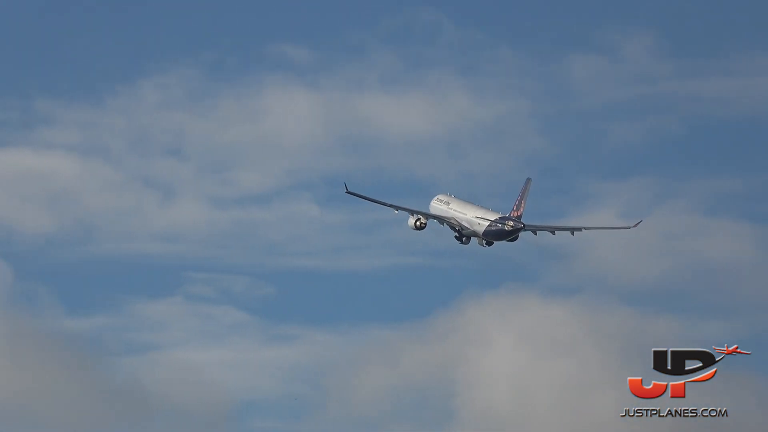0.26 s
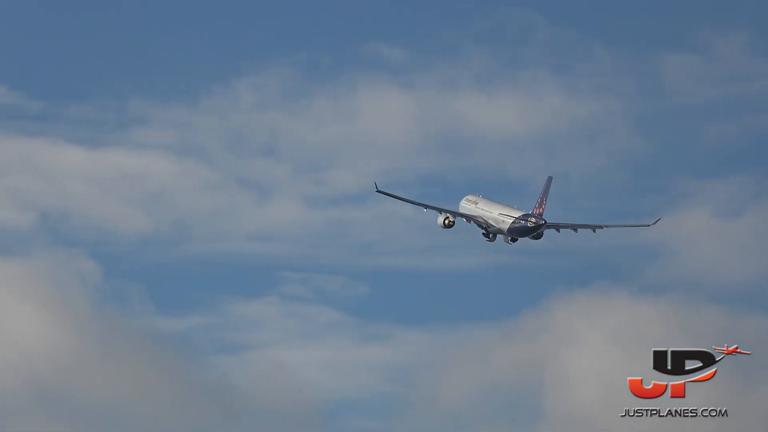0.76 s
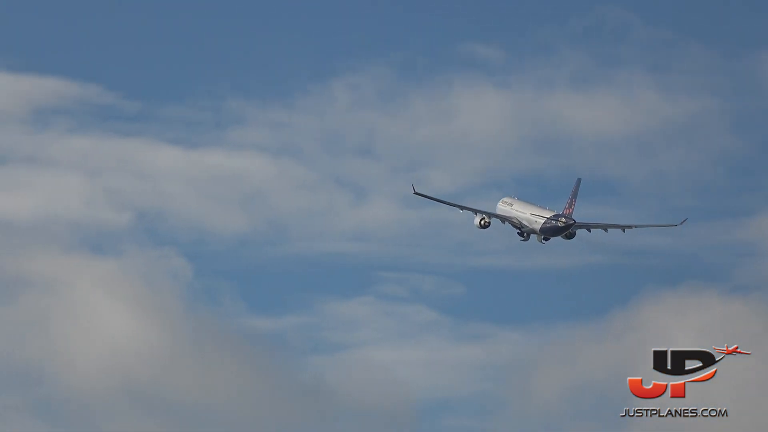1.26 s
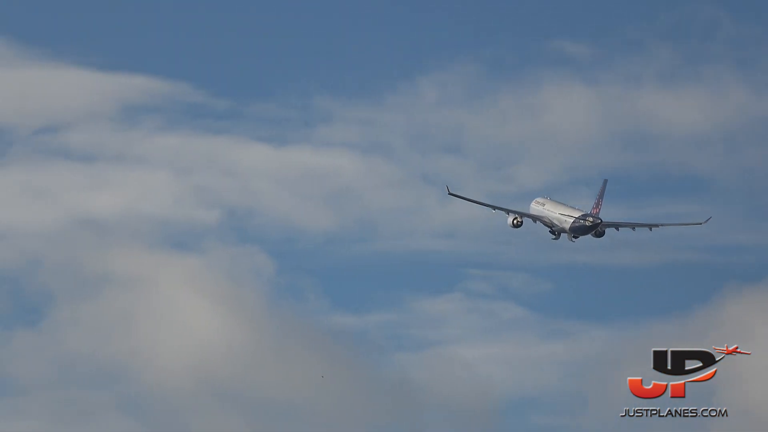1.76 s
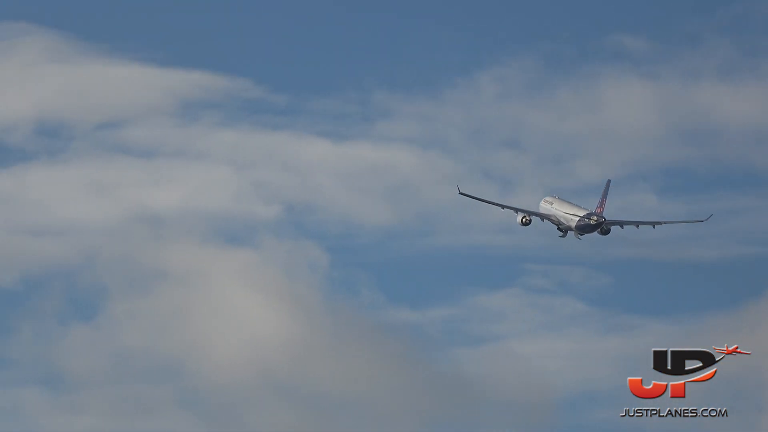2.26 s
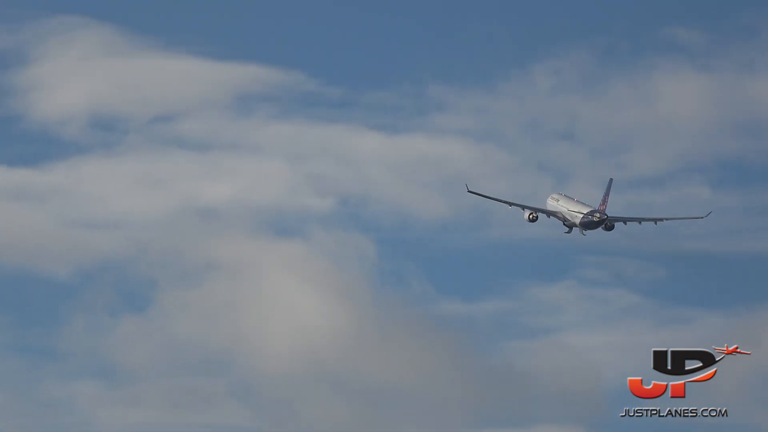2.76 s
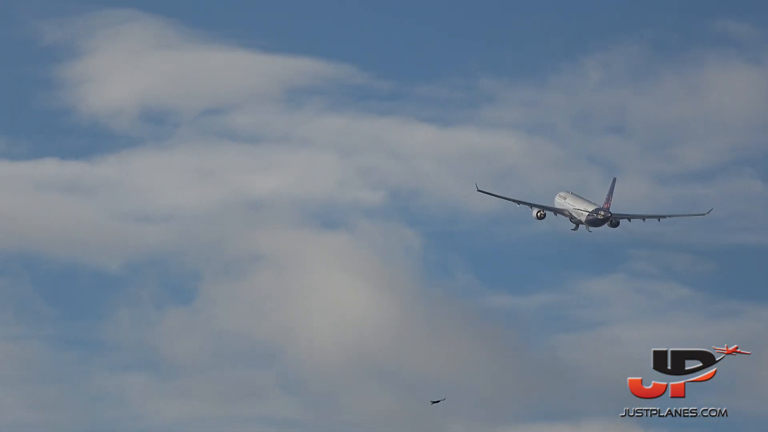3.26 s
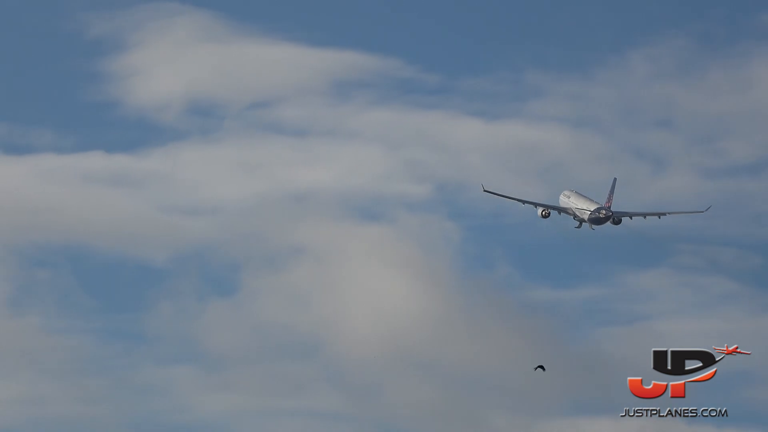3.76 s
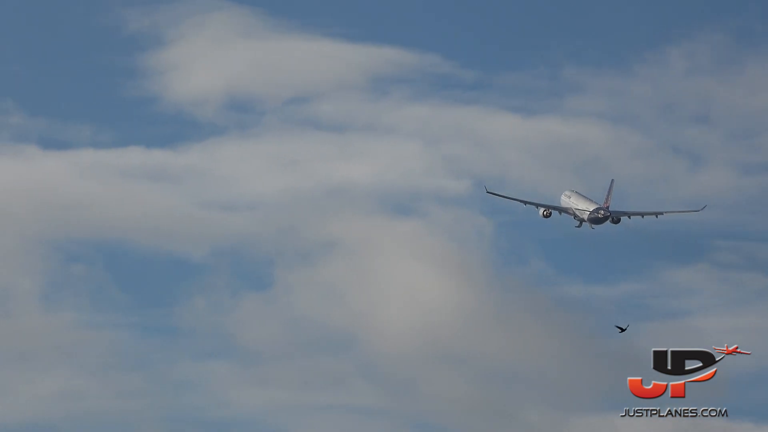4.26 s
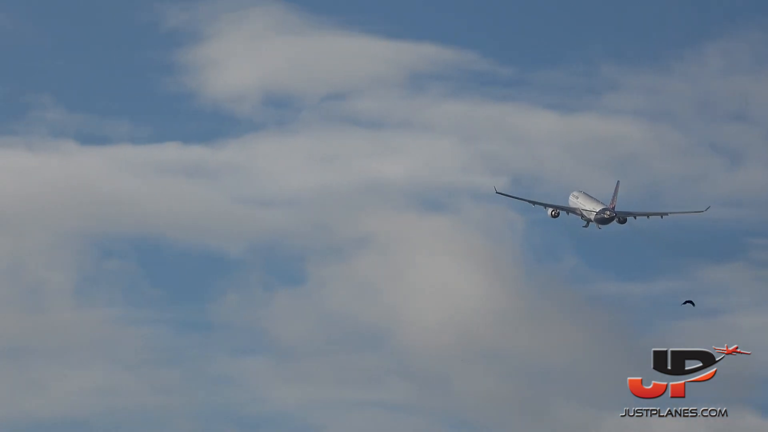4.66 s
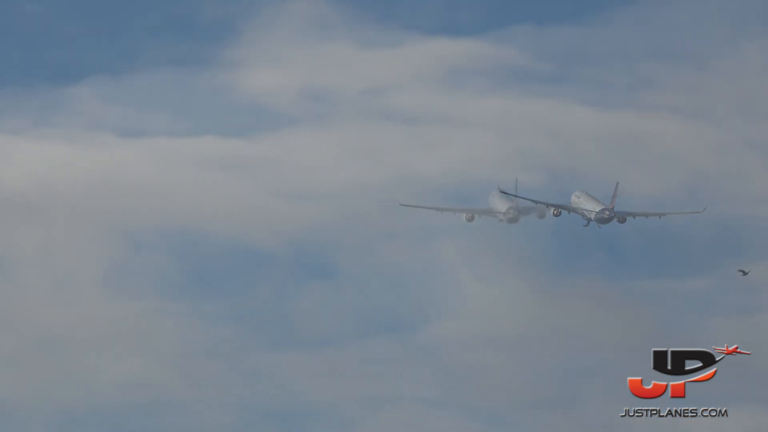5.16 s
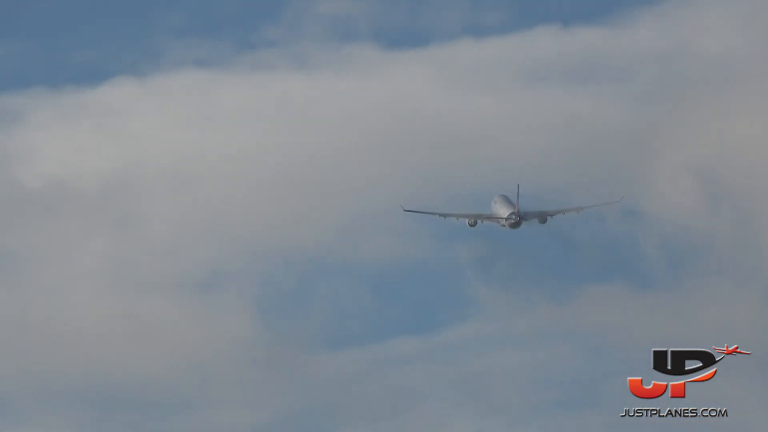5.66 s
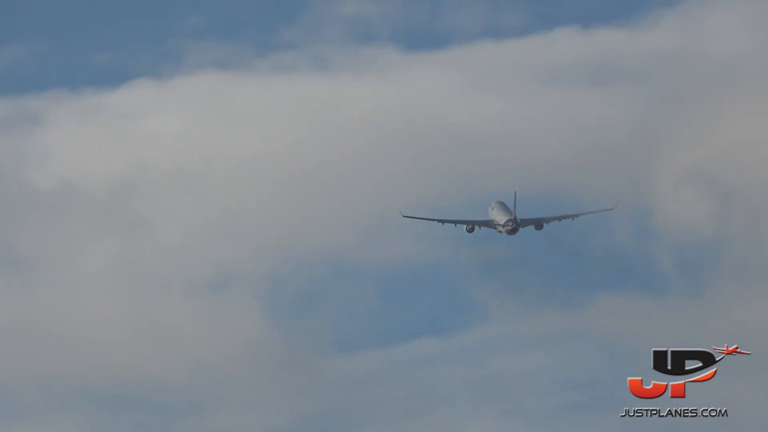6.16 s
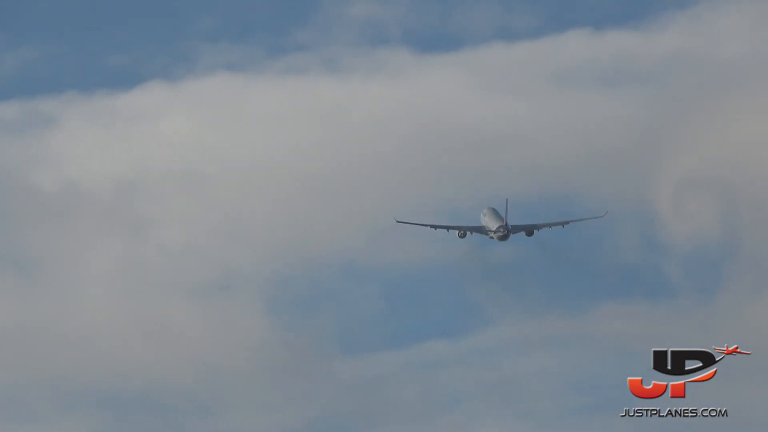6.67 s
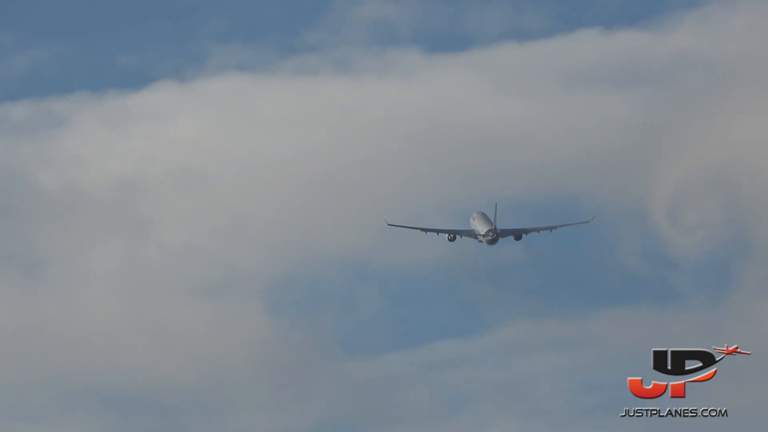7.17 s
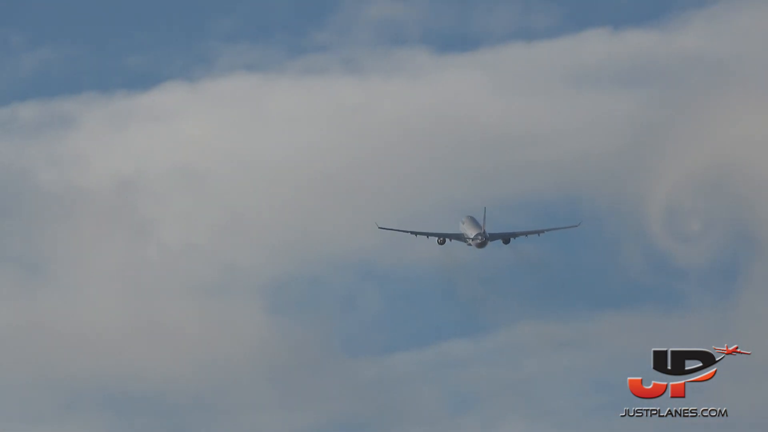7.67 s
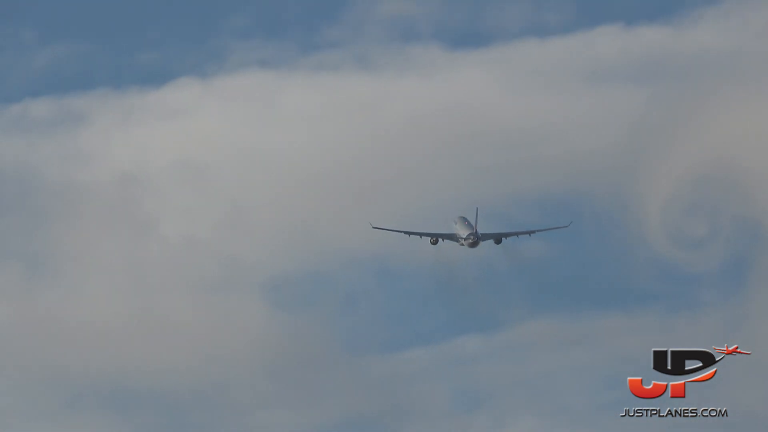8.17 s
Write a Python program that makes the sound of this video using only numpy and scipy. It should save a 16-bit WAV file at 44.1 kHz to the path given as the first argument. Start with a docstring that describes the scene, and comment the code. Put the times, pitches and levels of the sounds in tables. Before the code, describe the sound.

Loud jet exhaust roar with a raspy top fades to a far, right-leaning rumble, with faint bird chirps, then close dry clicks and rustling.

```python
"""Open ground, a twin-engine airliner climbing away: banded noise makes its exhaust roar, first fairly near
with a ground-boosted boom and a hissing top, then dissolving into a dull, far-off rumble that leans right.
Close by, dry ticks crack and ring (ringing modes and rattle), a hand-held camera body rustles (bright noise and
grains), a small bird chirps faintly (hoarse sine sweeps), and the microphone hisses (steady coloured noise)."""
import sys
import numpy as np
from scipy import signal
from scipy.fft import rfft, irfft, next_fast_len
from scipy.io import wavfile
from scipy.ndimage import uniform_filter1d

SR = 44100
rng = np.random.default_rng(int(sys.argv[2]) if len(sys.argv) > 2 else 0)


def dump(signal):
    """Clip the signal to [-1, 1] and save it as 16-bit WAV at the path in sys.argv[1]."""
    limited = np.clip(np.atleast_2d(signal).T, -1, 1)
    pcm = np.round(limited * 32767).astype(np.int16)
    wavfile.write(sys.argv[1], SR, pcm)


N = 371763
T = np.arange(N) / SR   # seconds
SIZE = next_fast_len(N)
BIN_HZ = np.arange(1, SIZE // 2 + 2) * SR / SIZE   # starts one bin up, so that its logarithm exists
BIN_OCTAVE = np.log2(BIN_HZ)


def amp(db):
    """Decibels to gain."""
    return np.exp(np.asarray(db) * np.log(10) / 20)


def rms_one(x):
    """Scale to unit rms."""
    return x / np.sqrt(np.mean(x ** 2) + 1e-20)


def in_time(rows):
    """Draw a two-column table as a curve, one value a sample."""
    s, values = np.transpose(rows)
    return np.interp(T, s, values)


def at_hz(points, hz):
    """Read a spectrum table on a log-frequency axis."""
    table = np.array(points)
    return np.interp(np.log(hz), np.log(table[:, 0]), table[:, 1])


def drift(rate_hz):
    """Slow random wander of spread 1: noise through two equal one-pole smoothers."""
    step = 40   # samples between the slow values
    r = np.exp(-2 * np.pi * rate_hz * step / SR)
    noise = rng.standard_normal(N // step + 2002)
    slow = signal.lfilter([1], [1, -2 * r, r * r], noise)[2000:]   # skip the filter's settling
    return np.interp(np.arange(N) / step, np.arange(len(slow)), rms_one(slow))


def panned(x, lean_db):
    """Split between the channels, left minus right in dB, so that their mean keeps the level."""
    left = 2 / (1 + amp(-lean_db))
    return np.array([left * x, (2 - left) * x])


def filtered(x, order, hz, kind="low"):
    """Butterworth low or high pass."""
    return signal.sosfilt(signal.butter(order, hz, kind, fs=SR, output="sos"), x)


def coloured(x, spectrum):
    """Shape a signal to a spectrum table; rms 1."""
    return rms_one(irfft(rfft(x, SIZE) * amp(at_hz(spectrum, BIN_HZ)), SIZE)[..., :N])


# Near levels: deep rumble, ground boom, roar, and rasp swelling as the air clears.
# Each row: time in seconds, level in dB.
NEAR_RUMBLE = [(0, -28), (1.5, -30), (2, -31.5), (2.5, -29), (4.95, -30.5), (5.6, -23)]
NEAR_BOOM = [(0, -24.5), (0.449, -23), (.8, -24), (1.75, -21.5), (2.75, -25), (3.8, -28), (4.948, -29.5)]
NEAR_ROAR = [(0, -33.5), (1.35, -30), (1.9, -26), (2.4, -30), (2.8, -28.5), (3.45, -29.5), (3.7, -28.5),
             (4.2, -28.5), (4.5, -26), (4.7, -29.5), (4.95, -27), (5.4, -28.5)]
NEAR_RASP = [(0, -39), (.22, -36), (.5, -37), (1.35, -37), (1.62, -34.5), (1.9, -37), (2.2, -38),
             (2.6, -30), (2.8, -34.5), (3.03, -33), (3.4, -36.5), (3.75, -32.5), (4.151, -38.5),
             (4.47, -37.5), (4.62, -39), (4.85, -35), (4.97, -37), (5.4, -36)]
# The far roar, swelling in gusts. Each row: time in seconds, level in dB.
FAR_ROAR = [(5.7, -40), (6.22, -43.5), (6.45, -38.5), (6.58, -45.5), (6.7, -40), (6.8, -37.5), (7.02, -37),
            (7.2, -41), (7.4, -42), (7.5, -38.5), (7.7, -41.5), (7.78, -42), (7.91, -45), (8.0, -41),
            (8.43, -42)]
# Far rumble, boom, rasp and hiss. Each row: mean level in dB (before the slope, which is zero at 7 s),
# share of the roar's swing (ratio), slope in dB per second.
FAR_ZONES = [(-38.5, 0.59, -1), (-38, 1, -1.15), (-55.5, 0.25, -0.3), (-71, .4, -1)]
# The near sound fades out and the far sound in: start and end in seconds.
FADE_S = [4.76, 5.695]


def zone_levels():
    """Rumble, boom, roar, rasp and hiss in dB: near levels cross-fade by power into the far ones."""
    curves = (NEAR_RUMBLE, NEAR_BOOM, NEAR_ROAR, NEAR_RASP, FAR_ROAR)
    rumble, boom, roar, rasp, far_roar = (in_time(curve) for curve in curves)
    # the hiss swings a little wider than the rasp and thins with distance, in dB per second
    hiss = -44 + 1.14 * (rasp - rasp.mean()) - 0.69 * T
    near = (rumble, boom, roar, rasp, hiss)
    swing = far_roar - far_roar.mean()
    others = [db + share * swing + slope * (T - 7) for db, share, slope in FAR_ZONES]
    far = (*others[:2], far_roar, *others[2:])
    fade = np.interp(T, FADE_S, [0, 1])
    far_gain = fade ** 0.78   # the far sound comes up early
    return [20 * np.log10(np.hypot((1 - fade) * amp(a), far_gain * amp(b))) for a, b in zip(near, far)]


# Borders between rumble, boom, roar, rasp and hiss, in Hz.
ZONE_EDGES_HZ = [110, 330, 1100, 2200]
# Colour low over the ground, where its echo lifts the boom, then as the lift slides up and flattens,
# then far off. Each row: frequency in Hz, relative density in dB per Hz.
LOW_COLOUR = [(12, -37), (20, -9.5), (53, -0.5), (109, -11.5), (177, -0.5), (242, -1.5), (302, -8),
              (386, -16.5), (493, -8.5), (589, -15.5), (719, -13), (1120, -20.5), (1600, -21), (2790, -36),
              (4080, -50), (5300, -58), (6500, -64), (8980, -100)]
RISING_COLOUR = [(12, -35), (20, -9), (49, -0.5), (93, -10.5), (216, -2), (282, -7), (386, -9.5),
                 (515, -5.5), (1150, -8), (1530, -9), (2610, -27.5), (4080, -48), (5300, -62), (6500, -70),
                 (8980, -110)]
HIGH_COLOUR = [(12, -34), (20, -7.5), (44, 1.5), (119, -4.5), (316, -6), (386, -4.5), (482, -8),
               (939, -12.5), (1100, -16.5), (1570, -16), (2610, -35), (4080, -52), (5300, -83),
               (8980, -120)]
FAR_COLOUR = [(12, -33), (20, -4.5), (72, -1.5), (339, -6.5), (427, -10.5), (706, -14), (1070, -23.5),
              (2150, -42.5), (3000, -52), (3900, -70), (6600, -120)]
# When the colour leaves low, passes rising, reaches high, leaves high and becomes the far sound's, in seconds.
CLIMB_S = [2.099, 2.9, 4.002, 5.1, 5.65]
# The boom swings right as the plane turns. Each row: time in seconds, left minus right in dB.
TURN = [(0, 1), (.26, -0.5), (1.55, -2.5), (2.02, 1.5), (2.44, -4.5), (4.93, -9.5), (5.82, -13.5),
        (8.43, -14.5)]
# Stereo lean across the spectrum, near and far. Each row: frequency in Hz, left minus right in dB.
NEAR_LEAN = [(44, 1), (66, 4), (125, -1), (190, 1), (320, -2), (590, -3.5), (900, -3), (1500, 1.96),
             (1950, 0.5), (3500, 0.7)]
FAR_LEAN = [(50, .8), (90, -1.5), (150, -12.5), (290, -12.5), (415, -11.5), (700, -4.5), (1350, -4.5),
            (1700, 0.3), (2300, -4.9)]
# The treble's lean moves from near to far: start and end in seconds.
DISSOLVE_S = [5.4, 5.84]


def share_of_zone(colour, centres, zone):
    """Each band's level in dB relative to its whole zone, from the colour's power per band."""
    db = at_hz(colour, centres) + 10 * np.log10(centres)
    # overlapping bands add about a third more power
    return db - 10 * np.log10([1.35 * np.sum(amp(db[zone == z]) ** 2) for z in zone])


def jet(patchy_db, gust_db, sway_db, top_hz, skirt_db):
    """Turbulent mixing noise in fifth-octave bands; eddies in the air make each band swell and sink."""
    zone_db = zone_levels()
    far = np.interp(T, DISSOLVE_S, [0, 1])
    centres = 20 * 2 ** (np.arange(41) / 5)
    zone = np.searchsorted(ZONE_EDGES_HZ, centres)
    stages = (LOW_COLOUR, RISING_COLOUR, HIGH_COLOUR, HIGH_COLOUR, FAR_COLOUR)
    shares = [share_of_zone(colour, centres, zone) for colour in stages]
    # the turn, rescaled so that 0 is the near lean at 250 Hz and 1 the far lean
    near_boom, far_boom = at_hz(NEAR_LEAN, 250), at_hz(FAR_LEAN, 250)
    turn = (in_time(TURN) - near_boom) / (far_boom - near_boom)
    white = rfft(rng.standard_normal(SIZE))
    gust = gust_db * (0.5 + far) * (drift(5) + drift(25))   # shared by all bands, deeper far off
    sway_left = 1 - (1 - .35) * far   # the wandering lean calms once the plane is far
    out = 0
    for k, hz in enumerate(centres):
        triangle = np.maximum(0, 1 - 5 * abs(BIN_OCTAVE - np.log2(hz)))
        band = rms_one(irfft(white * triangle, SIZE)[:N])
        share_db = np.interp(T, CLIMB_S, [stage[k] for stage in shares])
        gain = amp(zone_db[zone[k]] + share_db + patchy_db * drift(5.4) + gust)
        # the bass swings right as the plane turns; the treble only moves with the dissolve
        bass = 1 / (1 + (hz / 550) ** 4)
        moved = bass * turn + (1 - bass) * far
        lean = (1 - moved) * at_hz(NEAR_LEAN, hz) + moved * at_hz(FAR_LEAN, hz)
        # the lean wanders band by band, most around the boom
        around_boom = np.exp(-(np.log2(hz / 250) / 1.1) ** 2)
        sway = .5 + sway_db * around_boom * sway_left
        out = out + panned(gain * band, lean + sway * drift(1.3))
    # the roar steps down abruptly in the lower treble; a faint airy skirt reaches above
    skirt = amp(skirt_db) * filtered(out, 6, top_hz, "high")
    return filtered(out, 10, top_hz) + skirt


def microphone_hiss(level_db, own_db):
    """Steady circuit noise, mostly common to both channels at the very top."""
    shared, *own = rng.standard_normal((3, N))
    bright = coloured(shared, [(3000, 0.0), (12000, -1.5), (15000, -1.5)])
    dull = coloured(np.array(own), [(4000, -20), (5500, 0), (10000, -1), (14000, -12)])
    return amp(level_db) * (bright + amp(own_db) * dull)


# Hands on the camera. Each row: time in seconds, level in dB.
RUSTLE_LEVEL = [(0, -75), (.7, -75.5), (1.2, -75), (1.5, -75), (2, -77), (2.25, -72.5), (2.6, -75.5),
                (3.7, -77), (4.2, -71), (4.45, -68.5), (4.7, -68.5), (5.4, -68), (6.2, -69.5),
                (8.43, -69.5)]
# Colour laid over noise and grains. Each row: frequency in Hz, gain in dB.
RUSTLE_COLOUR = [(1800, -13.5), (2500, -0.5), (4200, -4), (6500, -4.5), (8500, -13), (10000, -11.5),
                 (12000, -26)]
# Pitches at which rustle grains ring, in Hz.
GRAIN_HZ = [3430, 4500, 5450, 7000, 8800]


def rustle(grain_db, per_s, lean_db, grain_t60):
    """Skin on plastic: noise and clumped, briefly ringing grains; the upper noise differs by channel."""
    born = rng.random(N) < per_s * amp(6 * drift(8)) / SR
    size_db = 4 * np.minimum(rng.exponential(1, N), 4) + grain_db
    hits = born * amp(size_db) * rng.choice([-1, 1], N)
    dealt = rng.integers(0, len(GRAIN_HZ), N)   # each grain gets one pitch
    r = amp(-60 / (grain_t60 * SR))
    grains = 0
    for k, hz in enumerate(GRAIN_HZ):
        w = 2 * np.pi * hz / SR
        struck = hits * (dealt == k) + 1e-18   # the tiny offset keeps the filter from stalling
        grains = grains + signal.lfilter([np.sin(w)], [1, -2 * r * np.cos(w), r * r], struck)
    shared, *own = rng.standard_normal((3, N))
    noise = filtered(shared, 3, 5000) + grains + filtered(own, 3, 5000, "high")
    waver = amp(1.2 * drift(4.6))
    sides = amp([[lean_db / 2], [-lean_db / 2]])
    return amp(in_time(RUSTLE_LEVEL)) * waver * coloured(noise, RUSTLE_COLOUR) * sides


# Dry ticks, many centred, others leaning left. Each row: time in seconds, overall level in dB, # left minus
# right in dB, crack in dB, rattle in dB (both relative to the tick's level), brightness in dB per octave.
TICKS = [(0.377, -39, 4, 3, -16, 3), (0.9182, -56, -1, 10, -18, 3), (1.3582, -60, 0, 0, -10, -2),
         (2.0032, -58, 5, 7, -18, -3), (2.0247, -58, 0.0, 10, -18, 0), (2.4148, -58, 3, 12, -20, -2),
         (2.4886, -57, -3, 11, -18, -4), (2.781, -63, 0, 11, -16, 0), (3.8091, -54, 4, -16, -5, -4),
         (4.470, -54, -0.5, -12, -2, -2), (4.5948, -52, -1, -9, -11, -4), (4.7465, -56, -1, -11, -7, -8),
         (4.9074, -57, 4.5, -20, 3, -2), (5.1102, -51, 1, -14, -2, 3.5), (5.178, -43, -5, 12, -14, 1.5),
         (5.2, -46.5, 4, -13, -3, 3), (5.287, -58.5, 6, -30, 10.5, -1), (5.54, -59, 4, -16, 1, -2),
         (5.6589, -60, 5, -30, 8, -3), (5.727, -61, 10, -32, 7, -7), (5.885, -55, 4, -18, -5, -2),
         (5.9158, -40.5, 5, -4, -7, 4), (6.066, -60.5, 5, -30, 9, -10), (6.3973, -48, 5.5, -22, -12, 5),
         (6.4192, -38.5, 6, -19, -11, 7), (6.5349, -49, 5, -12, 1, 2), (6.7869, -56, 6, -18, 3, -4),
         (7.329, -40, 5, -4, -6, 8), (7.7642, -44, 5, -11, -4, 7), (7.8804, -44.5, 6, -6, -9, 14)]
# Ringing modes of the ticks. Each row: frequency in Hz, relative level in dB, # time to fall 60 dB in seconds.
RING_MODES = [(2890, 1, 0.012), (4420, -3.5, 0.006), (6500, -9.5, 0.0056), (8140, -11, 0.0073),
              (9890, -8.5, 0.0081), (14300, -29, .004)]


def ticks(rattle_s):
    """A dry crack rings the modes, each with a strength of its own, along with a duller rattle."""
    out, t = np.zeros((2, N)), np.arange(2200) / SR
    for s, level_db, lean_db, crack_db, rattle_db, bright_db in TICKS:
        scrape = filtered(rng.standard_normal(len(t)), 3, 6500)
        tick = amp(rattle_db) * scrape * np.exp(-t / rattle_s)
        for hz, db, t60 in RING_MODES:
            strength_db = db + rng.normal(0, 3) + bright_db * np.log2(hz / 7000)
            tick += amp(strength_db - 60 * t / t60) * np.sin(2 * np.pi * hz * t)
        tick[0] += amp(crack_db)
        thin = filtered(tick, 4, 2400, "high")
        at = round((s + .0012) * SR)   # the blow lands just after the first touch
        out[:, at:at + len(t)] += panned(amp(level_db) * thin, lean_db)[:, :N - at]
    return out


# Bird chirps. Each row: start in seconds, length in seconds, start pitch in Hz, end pitch in Hz,
# level in dB.
CHIRPS = [(1.165, 0.045, 7300, 7400, -75), (1.24, 0.02, 8200, 7200, -70), (1.432, .02, 5700, 5500, -60),
          (1.435, .018, 8300, 8200, -70), (1.545, .03, 7400, 7100, -74), (1.60, 0.033, 7500, 7000, -75),
          (1.675, .03, 7300, 7200, -73), (2.14, 0.056, 7500, 7100, -71), (2.272, .026, 6300, 5500, -61),
          (2.275, .022, 7450, 7200, -71), (2.83, .065, 7700, 7300, -74)]


def bird(lean_db, blur_hz):
    """Short, mostly falling chirps, sine sweeps made hoarse by a random shake in pitch."""
    out = np.zeros(N)
    for s, length, start_hz, end_hz, db in CHIRPS:
        count, at = round(length * SR), round(s * SR)
        shake = rms_one(uniform_filter1d(rng.standard_normal(count), size=40))
        hz = np.linspace(start_hz, end_hz, count) + blur_hz * shake
        tone = np.sin(2 * np.pi * np.cumsum(hz) / SR)
        out[at:at + count] += amp(db) * np.hanning(count) * tone
    return panned(out, lean_db)


def scene():
    """The plane climbing away, the small sounds close by."""
    plane = jet(patchy_db=0.85, gust_db=0.9, sway_db=1.0, top_hz=4070, skirt_db=-12.5)
    hiss = microphone_hiss(level_db=-76.5, own_db=-5)
    hands = rustle(grain_db=-2.0, per_s=350, lean_db=2.0, grain_t60=0.0023)
    close_by = hands + ticks(rattle_s=0.011)
    chirps = bird(lean_db=3, blur_hz=240)
    return plane + hiss + close_by + chirps


def record(dry):
    """A steep elliptic low-pass cuts the top above 15.7 kHz."""
    return signal.sosfilt(signal.ellip(12, .5, 70, 15700, fs=SR, output="sos"), dry)


dry = scene()
out = record(dry)
dump(out)
```